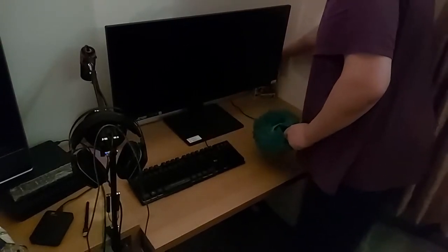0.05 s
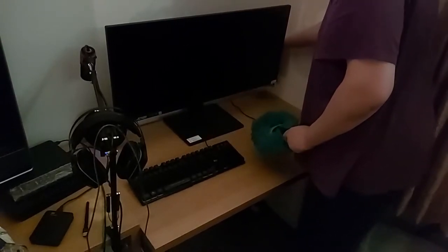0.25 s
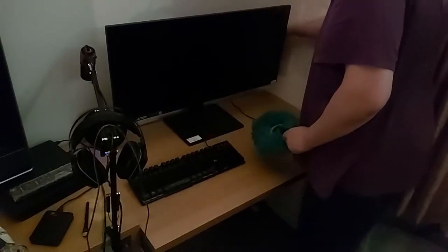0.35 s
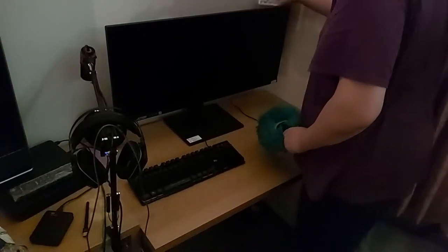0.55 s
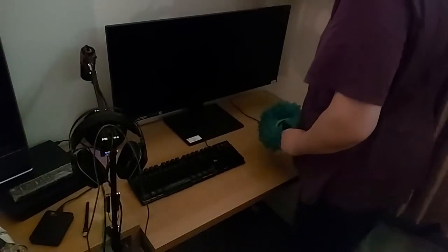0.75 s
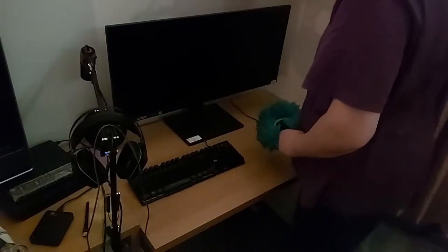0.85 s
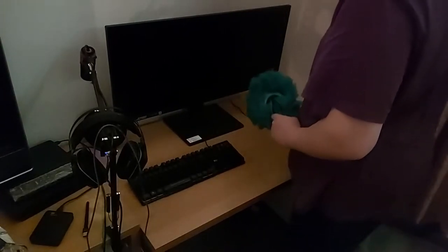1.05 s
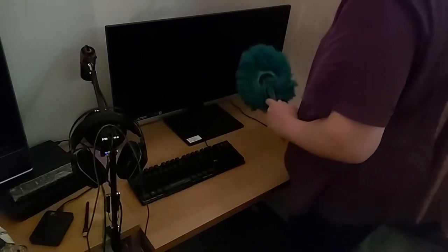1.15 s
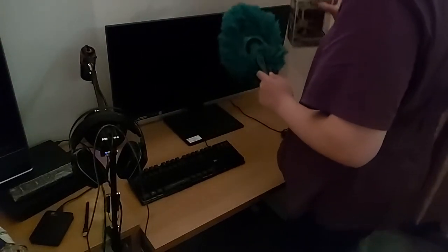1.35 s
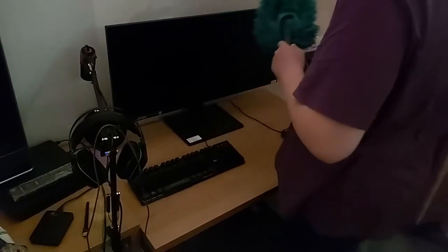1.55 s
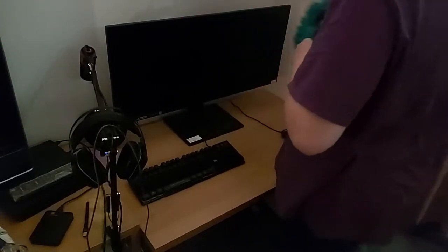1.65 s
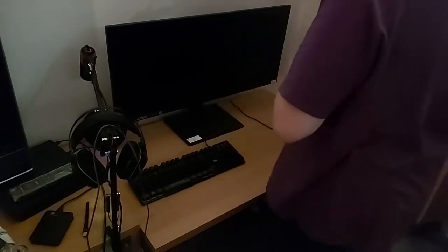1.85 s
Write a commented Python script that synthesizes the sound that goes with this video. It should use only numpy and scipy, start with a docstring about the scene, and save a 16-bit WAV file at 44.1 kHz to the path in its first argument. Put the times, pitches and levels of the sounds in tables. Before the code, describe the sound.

An object scrapes twice across wood, followed by a soft thud and faint clothing rustle.

```python
"""Two short, rasping scrapes as someone dusting a desk drags an object over a wooden shelf.
The object sticks and slips: the board drones and judders, dust hisses under it, harder catches knock.
A soft low thump follows. Clothes rustle over the faint rumble and hiss of a small room,
and everything sits a little to the right."""
import sys
import numpy as np
from scipy import signal
from scipy.fft import rfft, irfft, next_fast_len
from scipy.io import wavfile
from scipy.ndimage import uniform_filter1d, map_coordinates

SR = 44100
rng = np.random.default_rng(int(sys.argv[2]) if len(sys.argv) > 2 else 0)


def master_out(mix):
    """Clip the mix to full scale and print it as 16-bit PCM to the path in sys.argv[1]."""
    frames = np.transpose(np.atleast_2d(mix))
    ceiling = np.clip(frames, -1, 1)
    pcm = np.round(ceiling * 32767).astype(np.int16)
    wavfile.write(sys.argv[1], SR, pcm)


N = 83790

# harder catches of the object on the shelf (time [s], relative level [dB])
CATCHES = [(.247, -34), (0.308, -28.5), (.332, -34), (.371, -28), (.623, -30), (0.655, -29.5), (.71, -33.5)]


def scrapes():
    """Two drags over the shelf, each with its own swell, contact colour and dust."""
    # each stroke's faders, before the mix trims (time [s], drone [dB], body [dB], rasp [dB], grit [dB])
    first = [(0.135, -61, -72, -86, -82), (0.146, -48, -57, -65.5, -76), (0.2, -59.5, -58.5, -74.5, -81),
             (0.212, -43, -52, -66.5, -79), (0.24, -49, -58, -75, -81), (0.25, -33.5, -45.5, -60.5, -73),
             (0.305, -44.5, -36, -45.5, -64.5), (0.325, -41, -44, -47, -61),
             (0.355, -38, -42.5, -47.5, -60.5), (0.38, -33, -42.5, -58.5, -60.5),
             (0.42, -39, -51.5, -65, -76), (0.46, -61, -70, -84, -85)]
    second = [(0.556, -83, -84, -92, -90), (0.566, -45, -64, -82, -80), (0.572, -44, -40, -68.5, -58),
              (0.585, -33.5, -47, -61.5, -56.5), (0.61, -41, -39.5, -55.5, -51.5),
              (0.63, -43.5, -31, -56, -51.5), (0.655, -39.5, -37.5, -55.5, -53),
              (0.695, -38.5, -50, -60, -54.5), (0.712, -36.5, -34, -60.5, -55.5),
              (0.745, -41, -47.5, -71, -65.5), (0.765, -53.5, -56, -74, -71.5), (0.83, -68, -71, -97, -92)]
    # colour of the contact (frequency [Hz], level [dB])
    first_contact = [(100, 7), (200, 1.5), (310, -6.5), (460, 0.5), (580, 2), (780, -6), (1150, 7.5),
                     (2000, -5.5), (2800, -12), (4000, -19)]
    second_contact = [(100, -1), (200, 12.5), (310, 1), (460, 3), (560, -10), (660, -0.5), (800, -1.5),
                      (1030, 0.5), (1250, -0.5), (1950, -3), (2100, -22), (2280, 3.5), (4000, -15)]
    # colour of the dust (frequency [Hz], level [dB])
    first_dust = [(1000, -5), (2500, 3), (4000, -4.5), (5500, -2.5), (8300, -3), (9800, -13.5),
                  (15000, -17)]
    second_dust = [(1000, -6), (2100, -7.5), (2600, -4.5), (3700, 0), (4400, -1.5), (5100, 2), (6400, 0),
                   (8300, -0.5), (9700, -3.5), (11000, -4), (13000, -3), (15500, -12)]
    return (stroke(first, first_contact, first_dust, judder_db=-11)
            + stroke(second, second_contact, second_dust, judder_db=1))


def stroke(faders, contact, dust, judder_db):
    """One drag: tiny slips ring the board in three bands, over a judder and crackling dust."""
    drone_db, body_db, rasp_db, grit_db = -6, -1.5, -1.5, 1  # mix trims
    drone_below_hz, rasp_above_hz = 420, 1200
    drone, body, rasp, grit = gains(faders, outside_db=-120)
    force = slips(per_s=900, spread_db=2.5)

    def ring(lo, hi):
        def response(hz):
            return board(hz, lo, hi) * amp(along(contact, hz)) / (1 + (hz / (2 * hi)) ** 4)
        return spread(filtered(force, response))

    wood = (amp(drone_db) * drone * ring(0, drone_below_hz)
            + amp(body_db) * body * ring(drone_below_hz, rasp_above_hz)
            + amp(rasp_db) * rasp * ring(rasp_above_hz, SR))
    return wood + drone * judder(judder_db) + amp(grit_db) * grit * crackle(dust)


def slips(per_s, spread_db):
    """Friction as tiny random impulses of uneven size, in two rows with unrelated signs."""
    hits = rng.random(N) < per_s / SR
    sizes = amp(spread_db * rng.standard_normal(N).clip(-2, 2))
    return hits * sizes * rng.choice([-1, 1], (2, N))


def board(hz, lo=0, hi=np.inf):
    """The shelf's response: its resonances between lo and hi Hz, alternating in polarity."""
    # wooden modes (frequency [Hz], bandwidth [Hz], level [dB])
    modes = [(153, 87, -19), (244.5, 44, -9.5), (302, 13.8, 4.5), (365.5, 37.3, -6), (469.4, 39, -6.5),
             (578.4, 34, -2), (647, 38.7, -2), (707.5, 71, -6), (852, 114, -13), (1025, 44, -12),
             (1089, 78, -17.5), (1442, 108, -27), (1820, 107, -25), (2280, 88, -31.5)]
    return sum((-1) ** k * amp(db) * 1j * hz * width / (centre ** 2 - hz ** 2 + 1j * hz * width)
               for k, (centre, width, db) in enumerate(modes) if lo <= centre < hi)


def judder(level_db):
    """Stick-slip locked near the board's strongest mode: a wavering tone that slowly sags."""
    pitch_hz, sag_hz_per_s, wander_hz, flutter_db = 311, 27.14, 6.9, 2.1
    since_catch = np.arange(N) / SR - CATCHES[0][0]
    pitch = pitch_hz - sag_hz_per_s * since_catch + wander_hz * wobble(per_s=70)
    level = amp(level_db + flutter_db * wobble(per_s=60.06))
    return level * np.sin(2 * np.pi * np.cumsum(pitch) / SR)


def crackle(dust):
    """Dense grains of dust crushed under the object, in clumps that start sharply and die away."""
    clumps_per_s, clump_decay_s, clump_db = 78, 0.0053, -4.5
    starts = 1. * (rng.random(N) < clumps_per_s / SR)
    clumps = 1 + amp(clump_db) * signal.lfilter([1], [1, -np.exp(-1 / (clump_decay_s * SR))], starts)
    grains = (slips(per_s=5000, spread_db=0.5) + 0.25 * rng.standard_normal((2, N))) * clumps
    return spread(filtered(patchy(grains, depth_db=2.6), lambda hz: amp(along(dust, hz))))


def catches():
    """The object snags and jerks free, knocking the board."""
    soft_above_hz = 425  # a dull jerk, not a sharp tap
    blows = np.zeros(N)
    for s, db in CATCHES:
        blows[round(s * SR)] = amp(db)
    knocks = filtered(blows, lambda hz: board(hz) / (1 + 1j * hz / soft_above_hz))
    return room(knocks / np.abs(knocks).max() * blows.max())


def thump():
    """Three padded bumps blur into one low thud, with a short dull scuff."""
    # soft bumps (time [s], level [dB])
    bumps = [(1.286, -53.5), (1.302, -45), (1.335, -49.5)]
    # the low modes they ring (frequency [Hz], level [dB], T60 [s])
    thud_modes = [(65, -2, .2), (89.2, 3, 0.17), (136, -1, 0.19), (193, -3, 0.15), (293.6, -7, .35),
                  (454, -13, 0.14)]
    # colour of the scuff (frequency [Hz], level [dB])
    scuff_colour = [(30, -22), (80, 4), (200, -5.5), (400, -2), (650, -5.5), (900, -27), (1500, -31),
                    (3000, -50), (7000, -43), (15000, -45)]
    attack_s, mode_spread_db, scuff_db, scuff_t60_s = 0.0031, 1.9, -46, 0.23
    t, thud = np.arange(N) / SR, np.zeros(N)
    for s, db in bumps:
        age = np.maximum(t - s, 0)
        ring = sum(amp(level + rng.normal(0, mode_spread_db) - 60 * age / t60)
                   * np.sin(2 * np.pi * hz * age) for hz, level, t60 in thud_modes)
        thud += amp(db) * ring * (1 - np.exp(-age / attack_s))
    age = np.maximum(t - bumps[0][0], 0)
    scuff = amp(scuff_db - 60 * age / scuff_t60_s) * (1 - np.exp(-age / attack_s))
    return room(thud) + scuff * rush(scuff_colour)


def clothes():
    """Low rustle, a soft swish and light brushing of fibres as the arm moves."""
    # faders of the rustle and the swish (time [s], level [dB])
    rustle_fader = [(0, -56.5), (.08, -59), (.16, -61.5), (.5, -57.5), (.9, -67), (1.15, -64), (1.3, -59.5),
                    (1.42, -56), (1.55, -66), (1.9, -74.5)]
    swish_fader = [(0, -75), (.1, -79.5), (.9, -78.5), (1.15, -84), (1.23, -68), (1.32, -69), (1.45, -96),
                   (1.9, -92)]
    # light brushes (time [s], half-width [s], level [dB])
    brushes = [(.06, 0.1, -77.5), (1.344, 0.041, -75.5)]
    # colours of the three fabric layers (frequency [Hz], level [dB])
    rustle_colour = [(50, -37), (120, -5), (190, 1), (270, -0.5), (310, 0), (360, -5.5), (450, -13),
                     (650, -24.5), (1500, -34), (5000, -48.5)]
    swish_colour = [(200, -28), (600, 4.5), (1100, 0.5), (1700, -10), (3000, -15.5), (8000, -28),
                    (15000, -31)]
    fibre_colour = [(1500, -31), (4000, 1.5), (5600, -3.5), (7500, 0), (10000, -9), (15000, -15)]
    t = np.arange(N) / SR
    rustle = gains(rustle_fader)[0] * rush(rustle_colour)
    swish = gains(swish_fader)[0] * rush(swish_colour)
    brushing = sum(amp(db) * np.exp(-((t - s) / width) ** 2) for s, width, db in brushes)
    return rustle + swish + brushing * rush(fibre_colour)


def room(x):
    """A mono sound with the small room's short tail in each ear."""
    # the room's decay (frequency [Hz], T60 [s])
    decay = [(150, 0.33), (1000, 0.23), (10000, 0.26)]
    wet_db = -7
    hz, t, bands = signal.stft(rng.standard_normal((2, SR // 2)), SR, nperseg=256)
    tail = signal.istft(bands * amp(-60 * t / along(decay, hz)[:, None]), SR, nperseg=256)[1]
    tail /= np.linalg.norm(tail[0])
    return x + amp(wet_db) * signal.fftconvolve(x[None], tail, axes=1)[:, :N]


def room_tone():
    """A steady bed of faint rumble and hiss."""
    # colours of the bed (frequency [Hz], level [dB])
    rumble_colour = [(25, -8), (50, -3), (92, 1.5), (130, -1.5), (240, -17.5), (450, -18.5), (1240, -31),
                     (3000, -40), (4000, -54)]
    hiss_colour = [(500, 4.5), (2000, 0), (3500, -3.5), (5000, -6.5), (7000, -10), (9500, -7.5),
                   (12000, -1.5), (15500, -3.5)]
    rumble_db, hiss_db = -65.5, -70
    return amp(rumble_db) * rush(rumble_colour) + amp(hiss_db) * rush(hiss_colour)


def rush(colour):
    """Coloured stereo noise."""
    return spread(filtered(rng.standard_normal((2, N)), lambda hz: amp(along(colour, hz))))


def spread(pair):
    """Two unrelated signals to stereo: bass alike, treble diffuse; mid at rms 1."""
    # likeness of left and right (frequency [Hz], correlation [0..1])
    likeness = [(60, 0.73), (350, 0.83), (700, 0.44), (1100, 0.02), (1600, 0.15), (2500, 0.01), (10000, 0)]

    def mid_side(hz):
        angle = np.arccos(np.clip(along(likeness, hz), -1, 1)) / 2
        return np.array([np.cos(angle), np.sin(angle)])

    mid, side = filtered(pair, mid_side)
    return np.array([mid + side, mid - side]) / np.std(mid)


def patchy(pair, depth_db):
    """Makes the colour flicker from moment to moment in narrow bands."""
    bands = signal.stft(pair, nperseg=512)[2]
    flicker = uniform_filter1d(rng.standard_normal(bands.shape[1:]), size=4, axis=0)  # across frequency
    flicker = uniform_filter1d(flicker, size=7, axis=1)  # across time
    flicker /= np.sqrt(np.mean(flicker ** 2) + 1e-20)
    return signal.istft(bands * amp(depth_db * flicker), nperseg=512)[1][:, :N]


def wobble(per_s):
    """A smooth curve through per_s random points a second."""
    return map_coordinates(rng.standard_normal(4096), [np.arange(N) * per_s / SR], mode="wrap")


def amp(db):
    """Decibels to gain."""
    return 10 ** (np.asarray(db) / 20)


def along(points, hz):
    """Reads (frequency [Hz], value) points on a log axis."""
    freqs, values = np.transpose(points)
    return np.interp(np.log(hz + 1), np.log(freqs + 1), values)


def gains(faders, outside_db=None):
    """One gain per sample for each dB column after the time."""
    times, *columns = np.transpose(faders)
    return [amp(np.interp(np.arange(N) / SR, times, db, outside_db, outside_db)) for db in columns]


def filtered(x, response):
    """Shapes x with a response given as a function of frequency."""
    size = next_fast_len(N + SR // 2)
    return irfft(rfft(x, size) * response(np.fft.rfftfreq(size, 1 / SR)), size)[..., :N]


def scene():
    """Scrapes, knocks, thump and clothes over the room tone, all leaning to the right."""
    # stereo balance (frequency [Hz], left minus right [dB])
    balance = [(60, -1.5), (200, -4.5), (330, -7.5), (650, -1.5), (2400, -3), (4400, -.5), (8000, -1.3),
               (15000, -4)]
    mix = scrapes() + catches() + thump() + clothes() + room_tone()
    return filtered(mix, lambda hz: amp(np.array([along(balance, hz), -along(balance, hz)]) / 2))


def record(dry):
    """The microphone loses the deepest bass and keeps nothing above its band limit."""
    low_hz, top_hz = 39, 15750
    return filtered(dry, lambda hz: (hz < top_hz) * hz ** 2 / np.sqrt(hz ** 4 + low_hz ** 4))


dry = scene()
out = record(dry)
master_out(out)
```